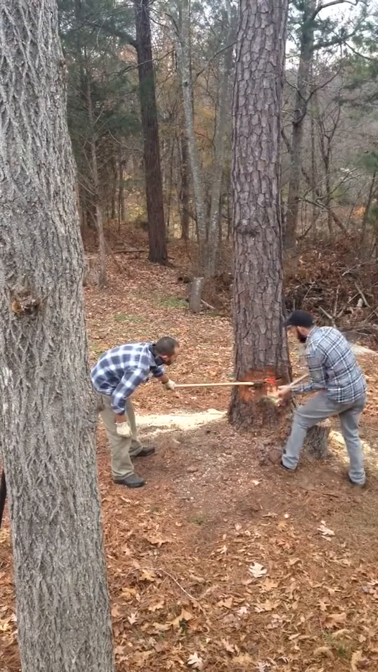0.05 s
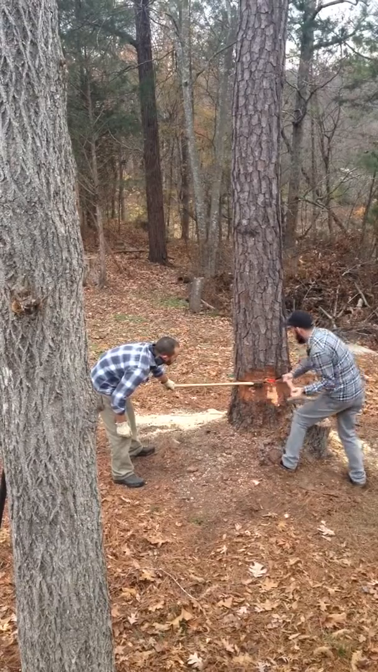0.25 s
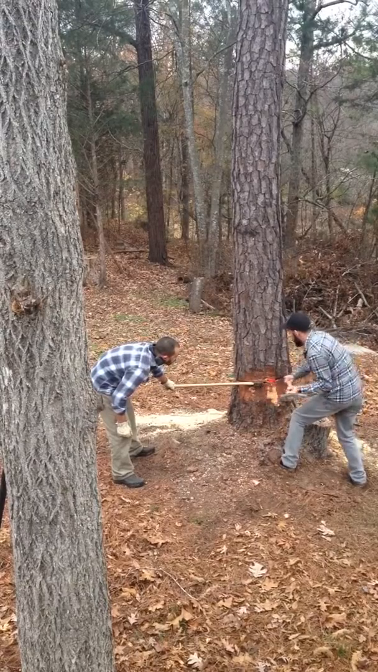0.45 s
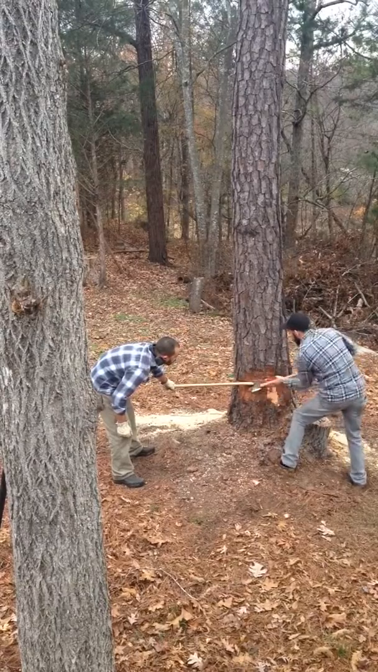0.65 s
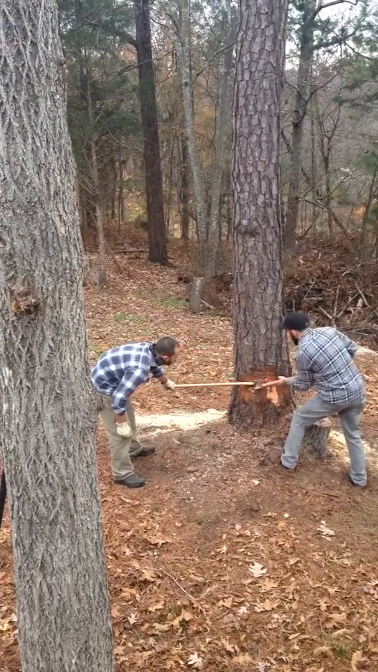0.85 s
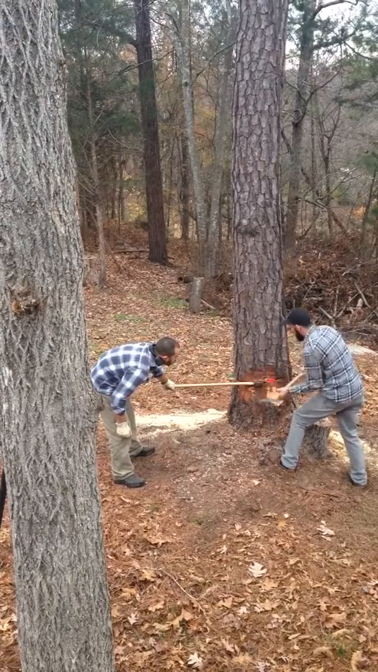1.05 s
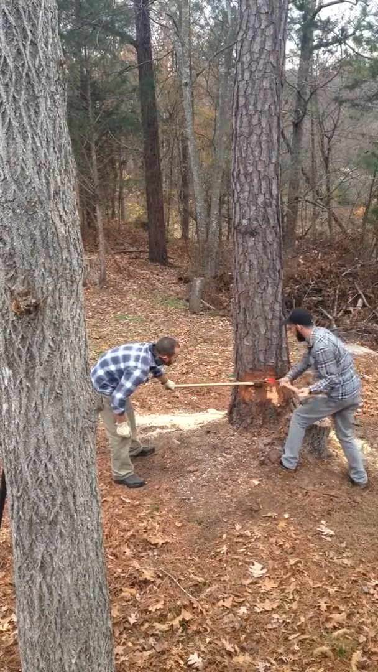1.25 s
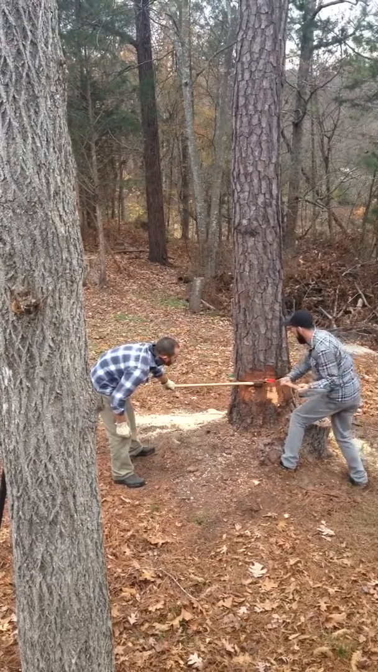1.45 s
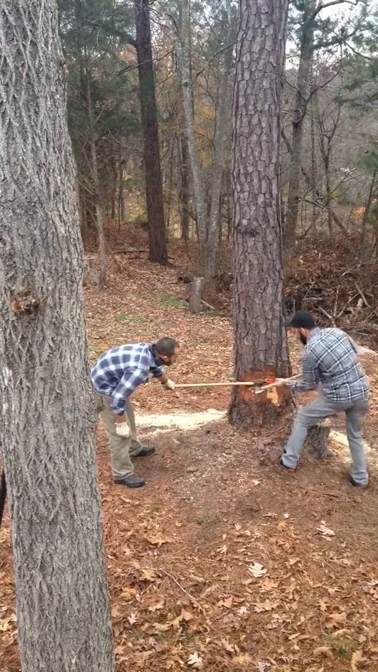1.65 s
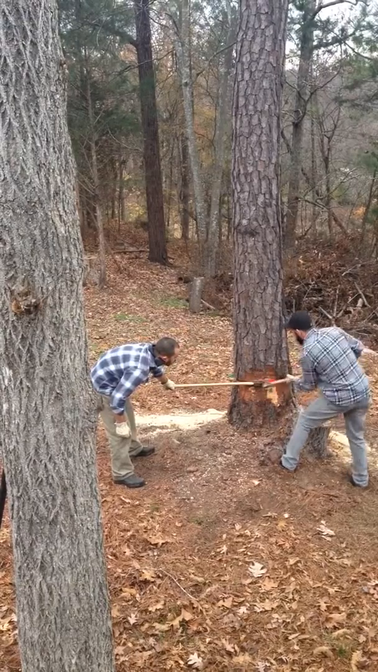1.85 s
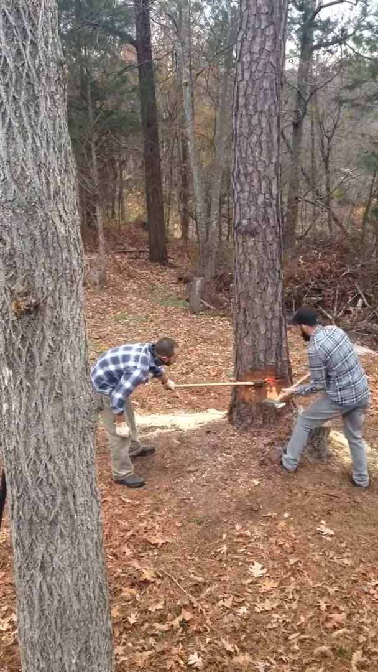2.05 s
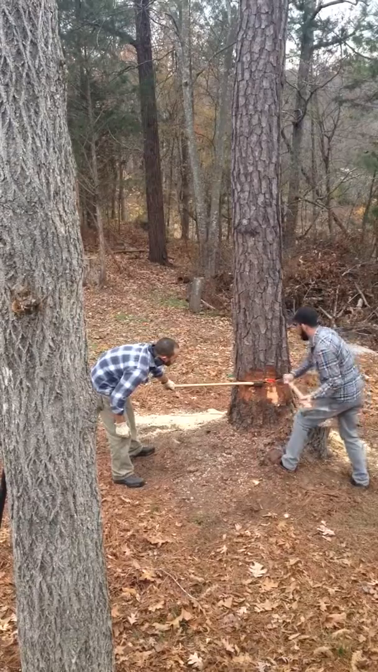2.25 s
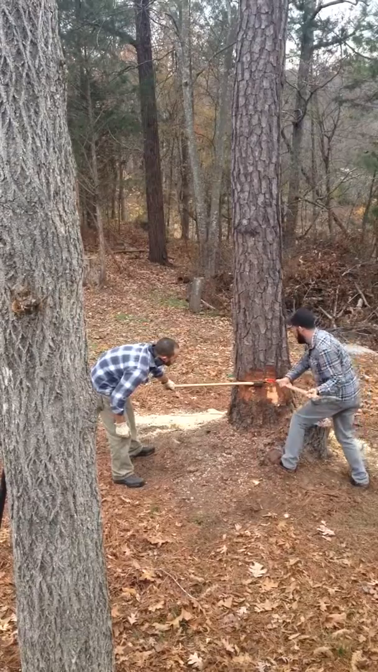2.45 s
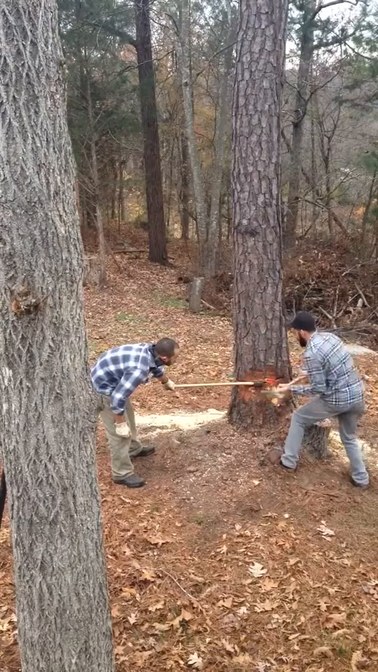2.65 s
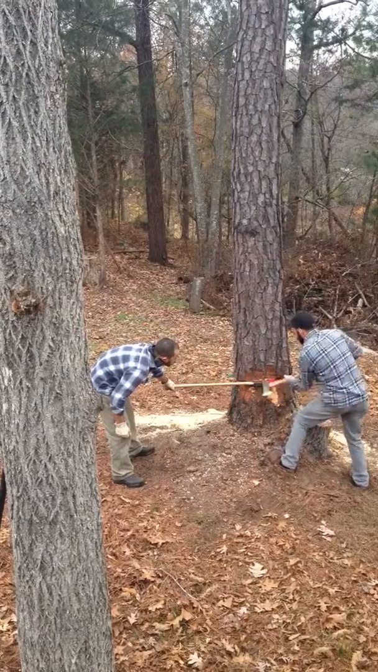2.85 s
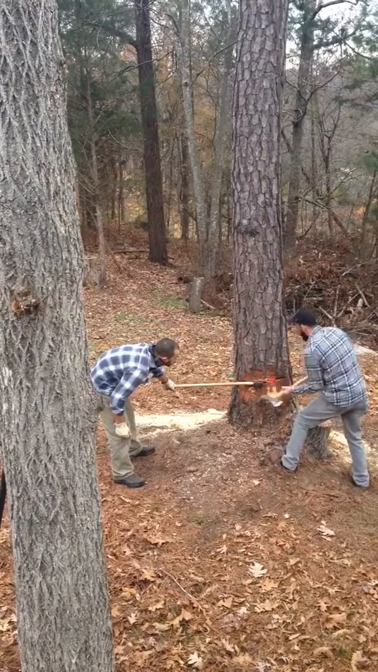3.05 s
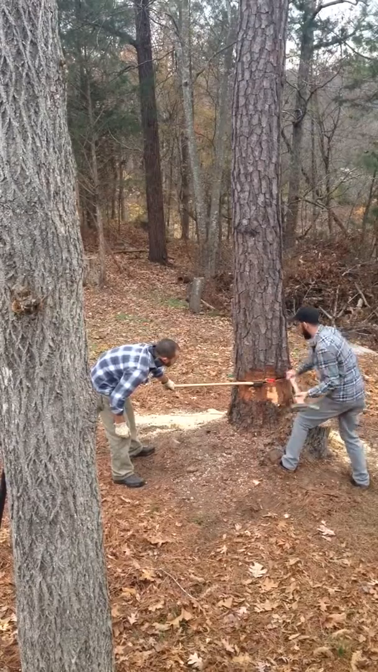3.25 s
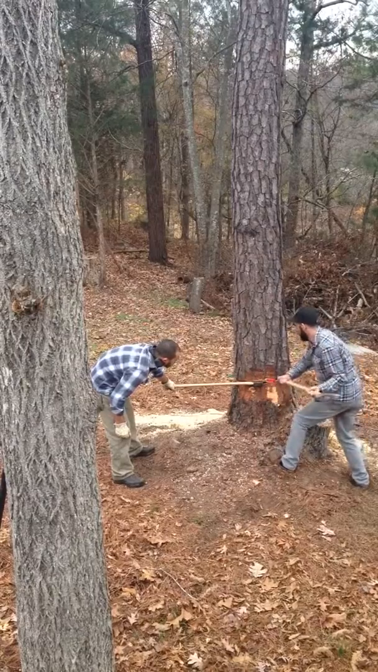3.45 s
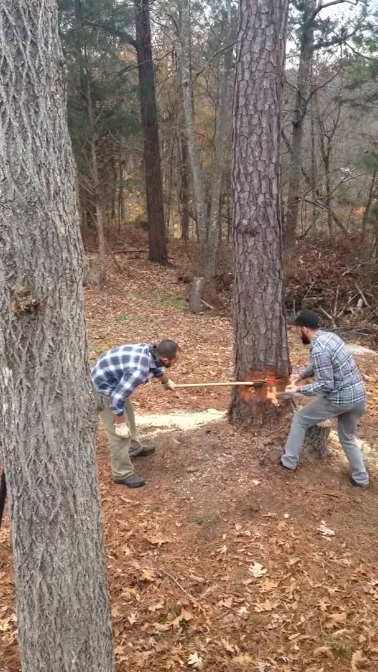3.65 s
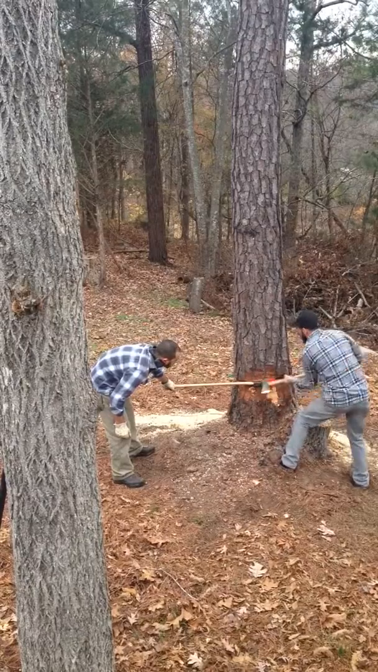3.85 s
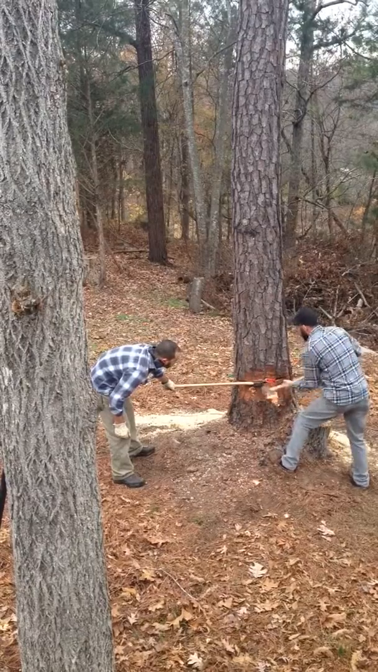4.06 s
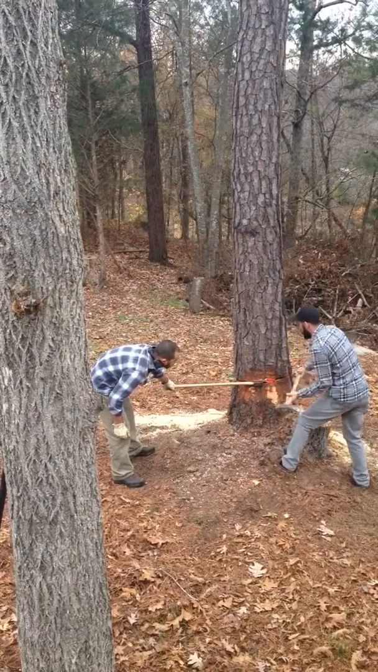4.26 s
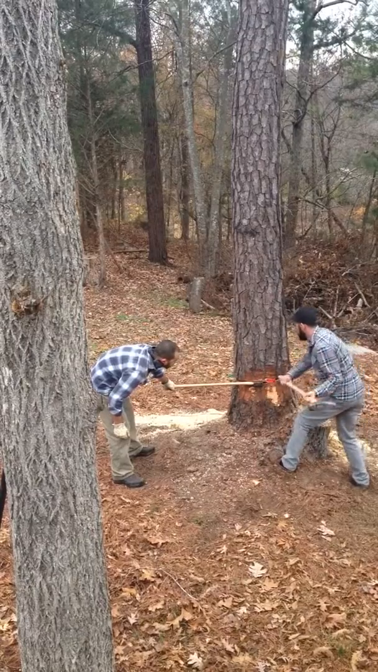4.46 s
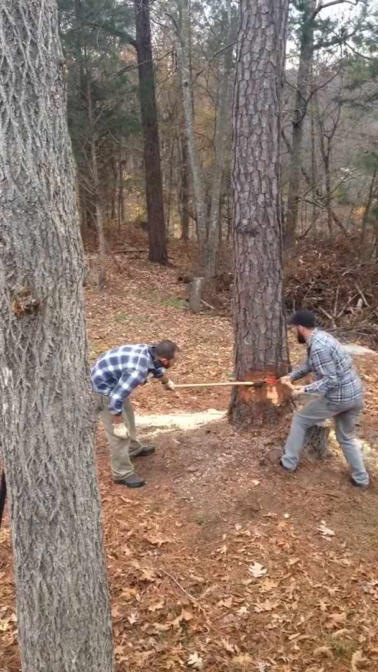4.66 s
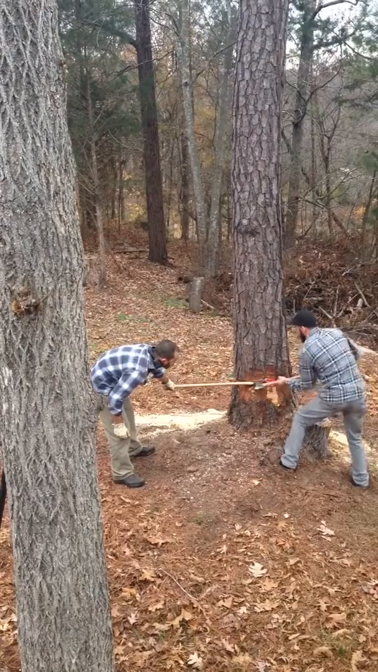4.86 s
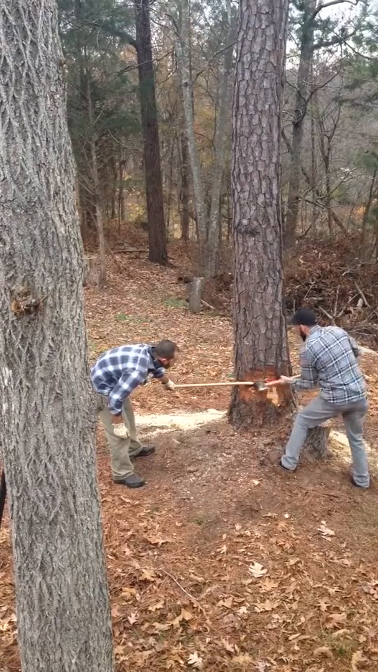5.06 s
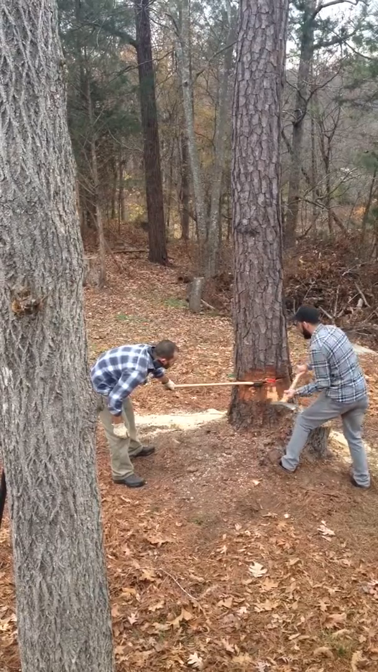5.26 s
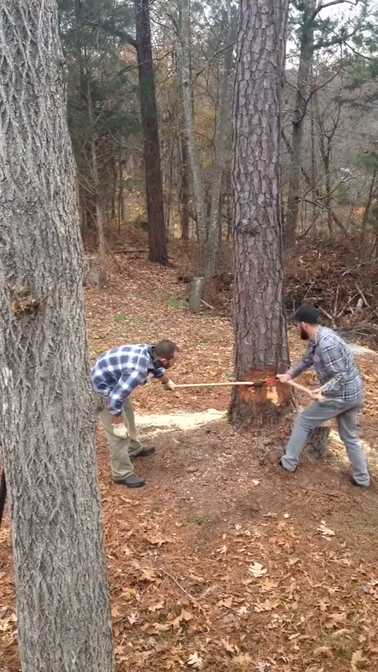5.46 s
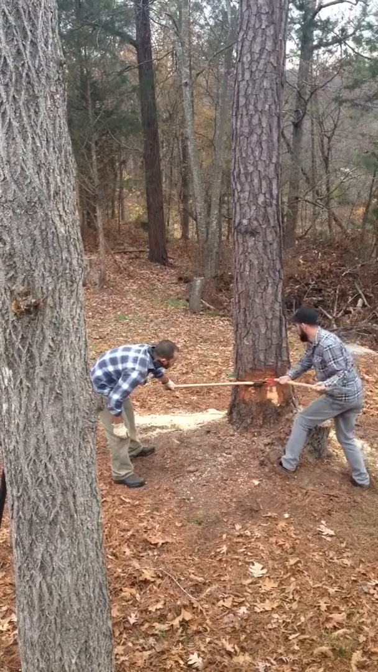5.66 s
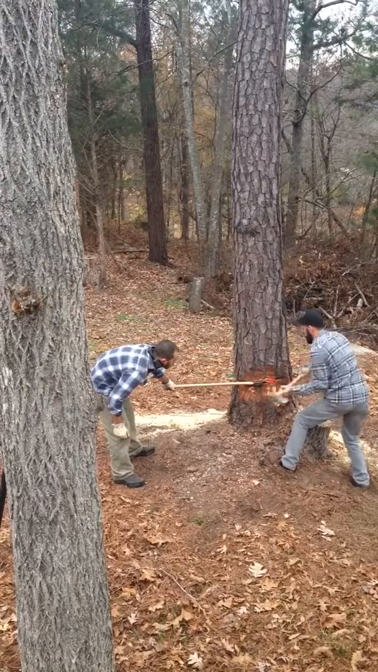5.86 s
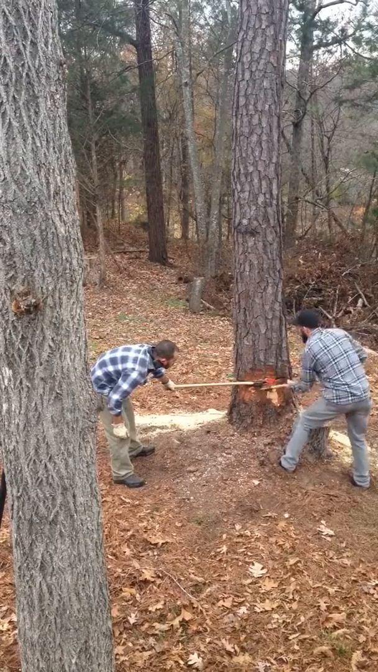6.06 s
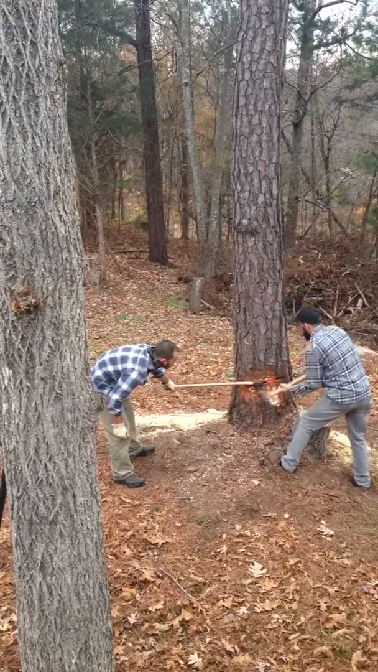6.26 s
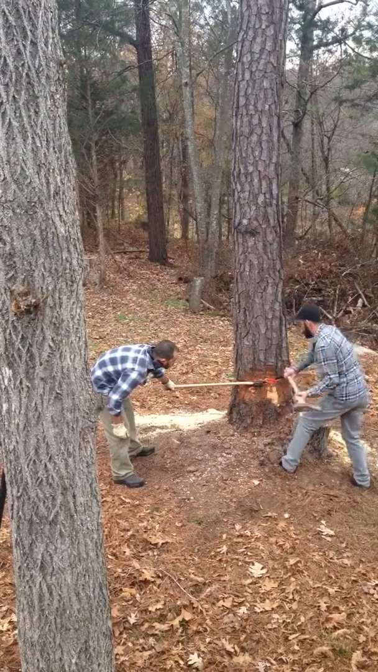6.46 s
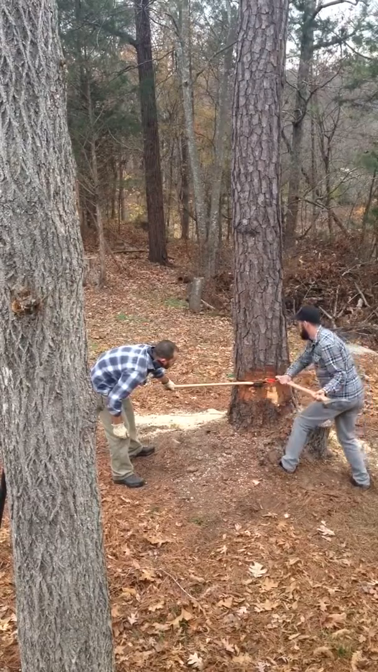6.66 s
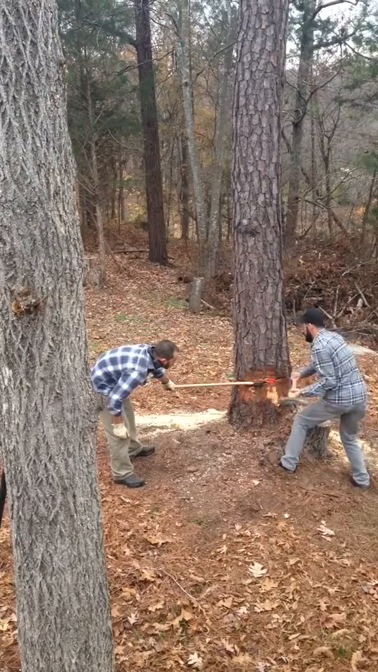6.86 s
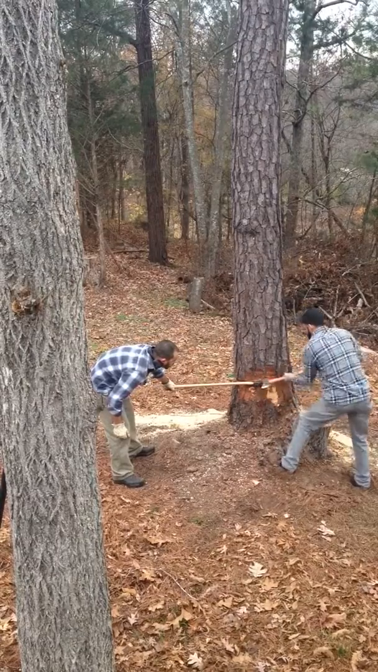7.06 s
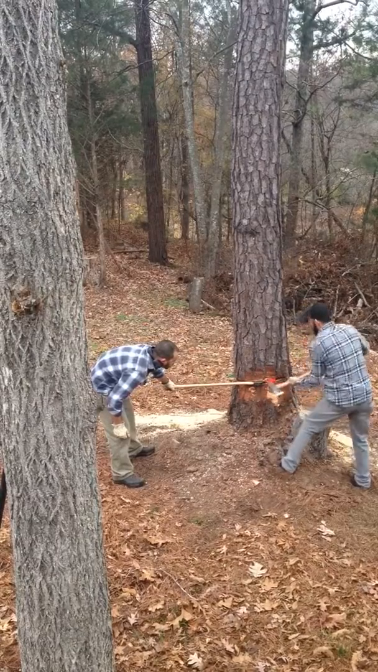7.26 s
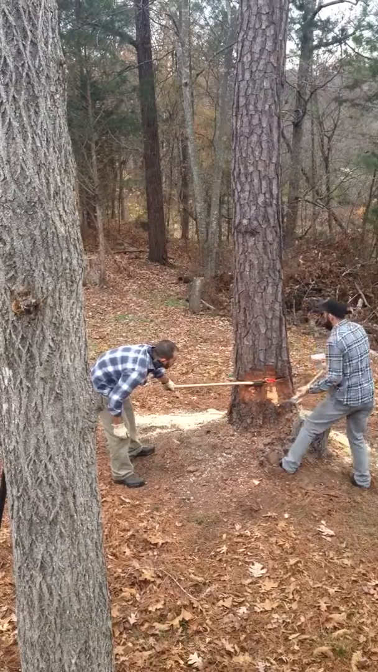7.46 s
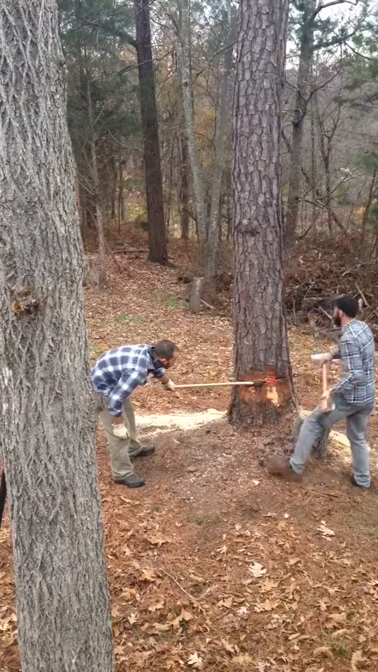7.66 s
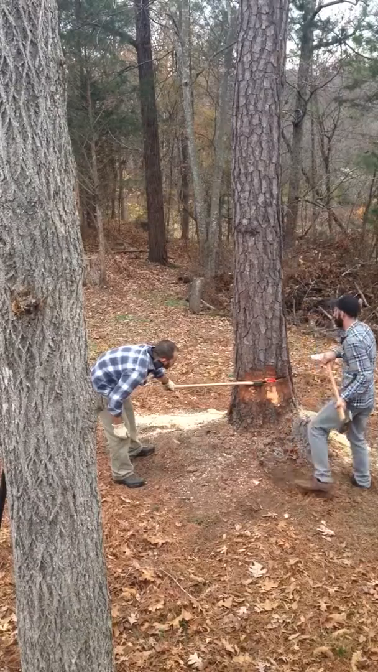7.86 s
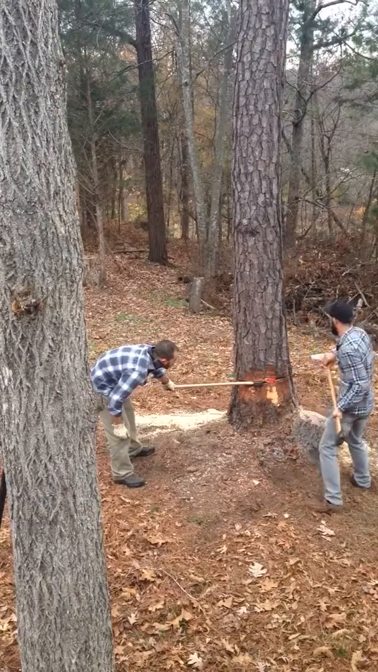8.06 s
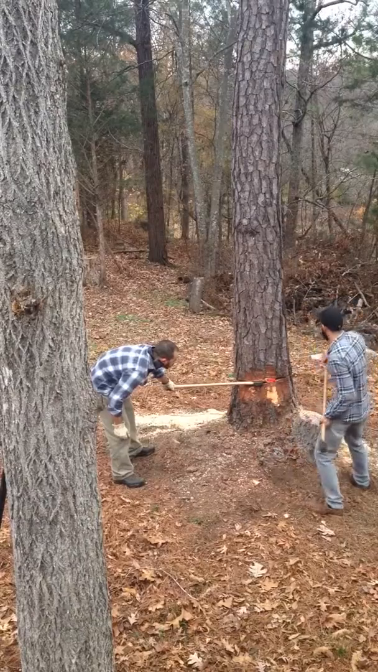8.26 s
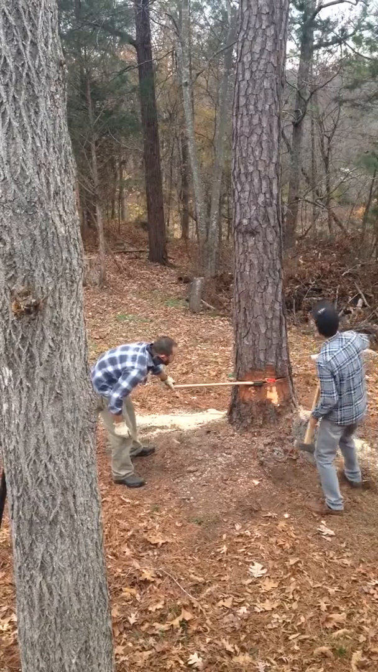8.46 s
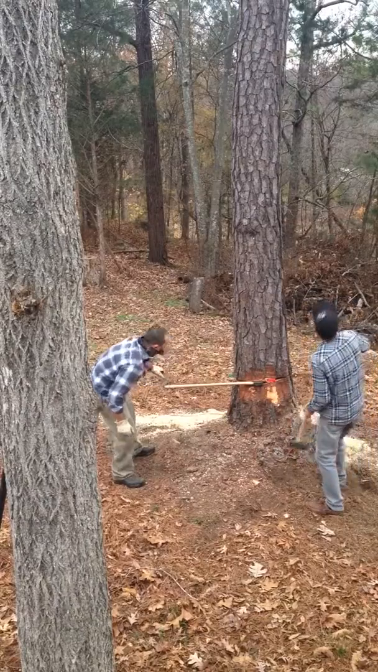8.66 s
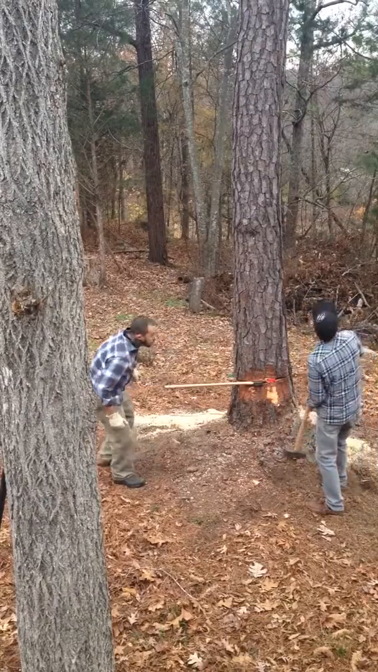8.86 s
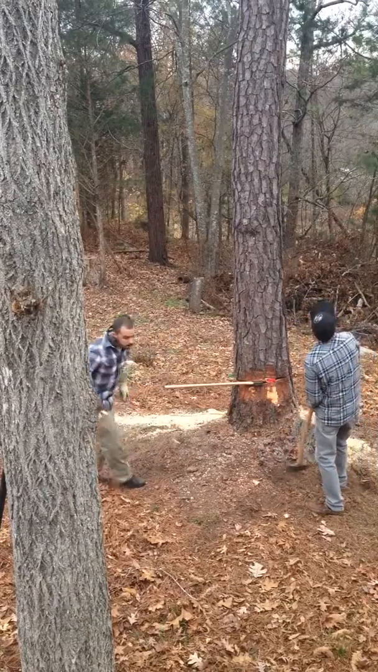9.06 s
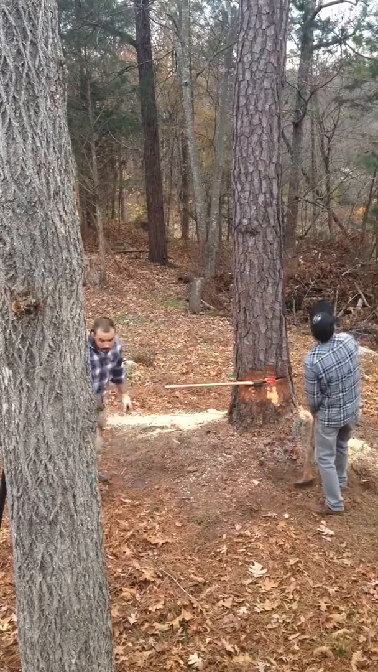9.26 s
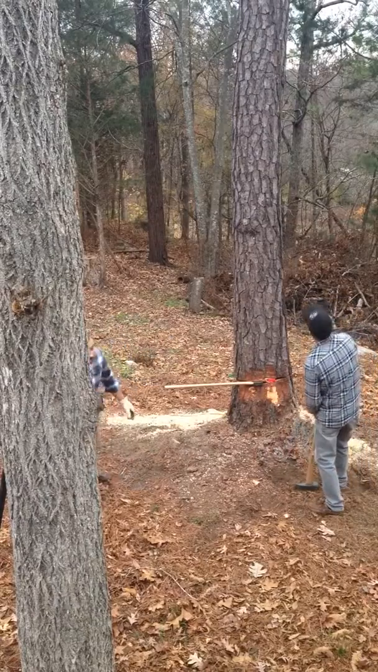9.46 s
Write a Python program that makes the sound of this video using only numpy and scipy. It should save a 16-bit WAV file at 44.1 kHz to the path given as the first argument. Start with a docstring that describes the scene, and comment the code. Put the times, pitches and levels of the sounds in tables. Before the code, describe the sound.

Seven sharp metallic blows on a wedge in a pine echo off surrounding trees, the sixth duller and woody, followed by footsteps in dry leaves.

```python
"""Open woods: a steel maul drives a felling wedge into a pine some metres away, seven blows after a first echo.
Each blow is a noise crack, short wedge knocks, fluttering steel tones and a low trunk thump; trees scatter it back.
As the cut grips the wedge its knock weakens and the ring moves up; one off-centre blow lands dull and woody.
Afterwards a foot comes down with a soft low thud and feet shift in dry leaves, all from coloured noise.
Behind lie soft air, a low rumble and a faint far two-toned hum that comes and goes."""
import sys
import numpy as np
from scipy import signal
from scipy.fft import rfft, irfft, next_fast_len
from scipy.io import wavfile
from scipy.ndimage import uniform_filter1d

SR = 44100
rng = np.random.default_rng(int(sys.argv[2]) if len(sys.argv) > 2 else 0)


def materialize(psi):
    """Save the field psi as 16-bit PCM at rate SR to the path in sys.argv[1].

    A 1-D psi becomes a single channel; in a 2-D psi each row is a channel.
    """
    bounded = np.clip(np.atleast_2d(psi).T, -1, 1)
    quanta = np.round(bounded * 32767).astype(np.int16)
    wavfile.write(sys.argv[1], SR, quanta)


N = 419391
T = np.arange(N) / SR  # time, s


def amp(db):
    """Turns decibels into a plain multiplier."""
    return 10 ** (np.asarray(db) / 20)


def evened(x):
    """Scales to an rms of one."""
    return x / np.sqrt(np.mean(x ** 2) + 1e-20)


def smooth_noise(shape, size):
    """Slowly wandering noise: a running average over size samples, at an rms of one."""
    return evened(uniform_filter1d(rng.standard_normal(shape), size=size))


def read(points, hz):
    """Joins (Hz, value) points on a log-frequency axis."""
    f, value = np.transpose(points)
    return np.interp(np.log(hz + 1), np.log(f), value)


def add(mix, s, sound):
    """Mixes a sound in at time s, which may lie before the start."""
    at = round(s * SR)
    sound = sound[max(-at, 0):]
    part = mix[max(at, 0):][:len(sound)]
    part += sound[:len(part)]


def colour(x, points):
    """Shapes the spectrum by (Hz, dB) points with a filter that never sounds ahead of its input."""
    size = next_fast_len(len(x) + 4096)
    log_gain = np.log(amp(read(points, abs(np.fft.fftfreq(size, 1 / SR)))))
    response = np.exp(np.conj(signal.hilbert(log_gain)))
    return irfft(rfft(x, size) * response[:size // 2 + 1], size)[:len(x)]


def mode(hz, db, t60):
    """One second of a dying sine, as one resonance of a struck body."""
    t = T[:SR]
    return amp(db - 60 * t / t60) * np.sin(2 * np.pi * hz * t)


def burst(rise, decay):
    """A puff of noise of unit energy, its broad bands evened out."""
    t = T[:SR // 6]
    x = rng.standard_normal(len(t)) * (1 - np.exp(-t / rise)) * np.exp(-t / decay)
    power = uniform_filter1d(abs(rfft(x)) ** 2, size=70)
    hz = np.fft.rfftfreq(len(t), 1 / SR) + 1
    return colour(x, np.c_[hz, -10 * np.log10(power)])


# tone of the still outdoor air: pitch_hz, relative_level_db (per Hz)
AIR_COLOUR = [(25, -13), (50, 0), (100, 0), (200, -2), (400, -7), (700, -10), (1100, -14.5), (1700, -18),
              (3000, -17.5), (6000, -22), (15000, -27)]


def still_air(level_db=-68):
    """Steady outdoor air: coloured noise."""
    return amp(level_db) * evened(colour(rng.standard_normal(N), AIR_COLOUR))


# tone of the low rumble: pitch_hz, relative_level_db (per Hz)
RUMBLE_COLOUR = [(30, -11), (100, 2.5), (400, -11), (1000, -29.5)]


def low_rumble(start_db=-71, ebb_db_per_s=0.54):
    """Low coloured noise that slowly ebbs."""
    return amp(start_db - ebb_db_per_s * T) * evened(colour(rng.standard_normal(N), RUMBLE_COLOUR))


HUM_FROM_S, HUM_SWELL_S, HUM_LENGTH_S, HUM_RELEASE_S = .85, 0.8, 2.25, .3
HUM_HZ, HUM_CLIMB_HZ_PER_S = 238, 2.3  # the lower of the two tones
HUM_DB, HUM_FADE_DB_PER_S = -66, 6  # at the top of its swell, then fading


def far_hum(upper_ratio=1.425, upper_db=-1, waver=.004):
    """Two wavering sines that swell, creep up in pitch and fade."""
    t = T - HUM_FROM_S
    hz = HUM_HZ + HUM_CLIMB_HZ_PER_S * t
    swell = np.clip(t / HUM_SWELL_S, 0, 1)
    release = np.clip((HUM_LENGTH_S - t) / HUM_RELEASE_S, 0, 1)
    level = swell * release * amp(HUM_DB - HUM_FADE_DB_PER_S * np.maximum(t - HUM_SWELL_S, 0))
    hum = np.zeros(N)
    for ratio, tone_db in [(1, 0), (upper_ratio, upper_db)]:
        drift = 1 + waver * smooth_noise(N, 2000)
        hum += amp(tone_db) * np.sin(2 * np.pi * np.cumsum(ratio * hz * drift) / SR)
    return level * hum


def distance():
    """The background: air, rumble and far hum together."""
    return still_air() + low_rumble() + far_hum()


# twigs and dry leaves snapping underfoot: start_s, peak_db (before TWIG_DB), pitch_hz (the strongest)
TWIG_SNAPS = [(1.634, -58, 1970), (1.727, -38, 3130), (2.1184, -46, 1830), (2.4588, -44, 3840),
              (8.2173, -46.5, 7640), (8.3124, -48, 12300), (8.356, -56, 3360), (8.4224, -53, 4530),
              (8.4894, -43, 7950), (8.5614, -44, 3950), (8.6418, -45.5, 3940), (9.2974, -45.5, 4860)]
# tone of one snap: pitch_ratio (times the strongest pitch), relative_level_db
SNAP_COLOUR = [(.1, -24.5), (.4, -9.5), (0.749, -4), (1, 0.5), (1.3, -5.5), (2, -9.5), (4, -22.5)]
TWIG_DB = -2.5  # added to every snap's peak


def twigs():
    """Snaps: a sharp puff of noise with a weaker, longer tail."""
    out = np.zeros(N)
    for s, db, hz in TWIG_SNAPS:
        puff = burst(0.0003, 0.0023) + 0.27 * burst(.003, .02)
        snap = colour(puff, np.array(SNAP_COLOUR) * [hz, 1])
        add(out, s, amp(db + TWIG_DB) * snap / abs(snap).max())
    return out


# a heavy step on soil: start_s, peak_db
SOIL_THUDS = [(9.013, -37), (9.033, -47), (9.075, -52)]
# tone of the soil thud: pitch_hz, relative_level_db
SOIL_COLOUR = [(30, -23.5), (90, -0.5), (160, 4), (320, -8), (600, -28), (1500, -50), (8000, -50)]


def soil_thud():
    """A heavy step on soft soil: short, low puffs of noise."""
    out = np.zeros(N)
    for s, db in SOIL_THUDS:
        thud = colour(burst(0.0018, 0.008), SOIL_COLOUR)
        add(out, s, amp(db) * thud / abs(thud).max())
    return out


# footfalls in the leaves: start_s, level_db (before STEP_DB)
FOOTFALLS = [(9.0723, -55.5), (9.2688, -51), (9.2978, -56.5), (9.4694, -51.5)]
# tone of the leaf crackle: pitch_hz, relative_level_db (per Hz)
LEAF_COLOUR = [(100, -2), (1000, -7.5), (2000, -3), (4000, -1.5), (8000, -1.5), (15000, -8)]
# tone of the low shuffle: pitch_hz, relative_level_db (per Hz)
SHUFFLE_COLOUR = [(30, -10), (100, 2), (200, -7), (420, -9.5), (800, -25.5), (3000, -39)]
STEP_RISE_S, STEP_FADE_S, STEP_DB = 0.0045, 0.043, -13  # the crunch of one footfall
STIR_FROM_S, STIR_BUILD_S = 7.36, 0.83  # feet start to move once the blows are over
LEAVES_STILL_DB, LEAVES_STIRRED_DB, SHUFFLE_DB = -89, -72.5, -61.5


def feet_in_leaves(grain_db=2.0, clump_db=2):
    """One effort of the feet drives both the grainy crackle of the leaves and the low shuffle."""
    stir = 1 - np.exp(-np.maximum(T - STIR_FROM_S, 0) / STIR_BUILD_S)
    rustle = amp(LEAVES_STILL_DB) + amp(LEAVES_STIRRED_DB) * stir
    crunch = (1 - np.exp(-T[:SR] / STEP_RISE_S)) * np.exp(-T[:SR] / STEP_FADE_S)
    for s, db in FOOTFALLS:
        add(rustle, s, amp(db + STEP_DB) * crunch)
    # about 5000 separate grains a second, of uneven strength
    strength = amp(grain_db * np.minimum(rng.exponential(1, N), 6))
    crackle = rng.standard_normal(N) * strength * (rng.random(N) < 5000 / SR)
    crackle *= amp(clump_db * smooth_noise(N, 700))
    leaves = rustle * evened(colour(crackle, LEAF_COLOUR))
    shuffle = amp(SHUFFLE_DB) * stir ** 2 * evened(colour(rng.standard_normal(N), SHUFFLE_COLOUR))
    return leaves + shuffle


def ground():
    """Snapping twigs, a heavy step on soil, and feet moving through leaf litter."""
    return twigs() + soil_thud() + feet_in_leaves()


def scatter(lumps_db=1.5):
    """Two seconds of dense reflections, arriving in clumps."""
    size = 2 * SR
    return evened(rng.standard_normal(size) * amp(lumps_db * smooth_noise(size, 200)))


# the blow as the woods return it, fades being the time to drop 60 dB:
# pitch_hz, early_scatter_db, early_fade_s, far_wash_db, far_fade_s
WOODS_RETURN = [(40, 0, .3, -26.5, 1), (130, 5, .22, -18, 1), (430, 7.5, 0.25, -19, 1.2),
                (614, 5.5, 0.36, -14, 0.71), (720, 12, 0.97, -1.5, 6), (914, 2.5, 0.35, -9.5, 1.4),
                (1046, 16.5, .66, 0, 4.3), (1268, 10.5, 0.8, -3.5, 4.2), (1460, 2, 0.47, -9, 1.9),
                (2200, 9, 0.59, -3, 2), (3300, 2.5, .58, -15, 1.5), (5000, 1, 0.41, -19.5, 2.1),
                (8200, -2.5, 0.3, -37.5, .7), (10400, -12, 0.2, -43.5, 0.65), (15000, -21, .2, -55.5, .5)]
# single trunks nearby: delay_s, level_db, centre_hz
TRUNK_SLAPS = [(0.0248, 0.5, 3583), (.062, -7, 2200), (.089, 2.5, 990), (.113, -3, 1250),
               (0.1413, 0.5, 1500), (0.3012, -16, 1430)]


def woods(paths, build=0.018, patch_db=2.0, ripple_db=3):
    """A blow thrown back by the trees: early scatter, a long far wash, and slaps off single rough trunks."""
    hz, t, z = signal.stft(paths, SR, nperseg=512)
    table = np.array(WOODS_RETURN)
    columns = [read(np.c_[table[:, 0], column], hz)[:, None] for column in table.T[1:]]
    near_db, near_t60, far_db, far_t60 = columns
    power = 0
    for db, t60 in [(near_db, near_t60), (far_db, far_t60)]:
        # dividing by the length keeps the total energy of each fade
        power = power + amp(db - 60 * t / t60) ** 2 * np.log(10 ** 6) / (t60 * SR)
    # leaf litter returns the treble at once; the middle waits for the trunks
    rise = read([(400, 0.0035), (700, build), (1500, build), (4000, 0.0028)], hz)[:, None]
    patches = uniform_filter1d(rng.standard_normal(z.shape), size=5, axis=0)
    patches = evened(uniform_filter1d(patches, size=5, axis=1))
    # the many close resonances of the struck steel stay in its echo as ridges
    ridges = np.sqrt(2) * np.sin(np.cumsum(rng.uniform(.8, 2.6, len(hz))))
    ridges = ridges * np.clip(hz / 2000, 0, 1)
    texture = amp(patch_db * patches + ripple_db * ridges[:, None])
    z = z * np.sqrt(power) * (1 - np.exp(-t / rise)) * texture
    out = signal.istft(z, SR, nperseg=512)[1][:len(paths)]
    for delay, db, centre in TRUNK_SLAPS:
        bark = [(centre / 4, -22), (centre / 1.1, -2), (centre * 0.78, 0),
                (centre * 2, -12), (centre * 4, -35), (centre * 7, -65)]
        add(out, delay, amp(db) * colour(burst(0.00061, .002), bark))
    return out


# the trunk's thump, swelling again as the shock returns, fade being the time to drop 60 dB:
# delay_s, pitch_hz (varied slightly each blow), level_db, fade_s
TRUNK_WAVES = [(0, 205, -23.5, .055), (.003, 101, -30.5, 0.18), (.032, 172, -25.5, 0.16),
               (.036, 198, -34.5, 0.11), (0.063, 34, -44, 0.27), (0.109, 124.7, -32, 0.03)]


def trunk(swell=0.0037):
    """Low bending waves of the tree: softly starting, dying sines."""
    out = np.zeros(SR)
    for delay, hz, db, t60 in TRUNK_WAVES:
        wave = mode(hz * rng.normal(1, 0.0088), db, t60)
        add(out, delay, wave * (1 - np.exp(-T[:SR] / swell)))
    return out


# the wedge gripped in the cut, damped by the wood: pitch_hz, level_db (before knock_db), fade_s (to drop 60 dB)
WEDGE_TONES = [(740, -21, 0.075), (1123, -17, 0.039), (1954, -17.5, 0.035), (2134, -27, 0.054),
               (2580, -25, 0.032), (3250, -19.5, 0.038), (3450, -22.5, .02), (3810, -20.5, 0.025)]
# tone of the crack: pitch_hz, relative_level_db
CRACK_COLOUR = [(40, -10), (220, 11.5), (330, 5), (550, 13), (900, 12), (1500, 10.5), (2000, 12),
                (3300, 13.5), (4700, 13), (5500, 8.5), (7800, 10.5), (10500, 0), (15500, -4.5)]


def impact(knock_db, ground_delay=.0018, ground_share=0.97, chatter_db=-8, crack_db=-2):
    """Steel meets steel: a crack, its bounce off the ground, brief chatter, and the wedge's short knock."""
    crack = burst(.0008, 0.00078) + amp(chatter_db) * burst(0.0022, 0.0028)
    add(crack, ground_delay, ground_share * burst(.0002, 0.0023))
    # neighbouring tones start in opposite directions
    knock = sum(mode(*row) * (-1) ** k for k, row in enumerate(WEDGE_TONES))
    out = np.zeros(SR)
    add(out, .001, amp(knock_db) * knock)
    add(out, 0, amp(crack_db) * colour(crack, CRACK_COLOUR))
    return out


def ring(hz, db, t60, flutter_hz=30, scattered=.72, steady=1.4, swing_away=0.081, build=0.0047):
    """One steel tone: direct, then fluttering as the maul swings away and its tree paths interfere."""
    t, shift = T[:SR], np.fft.fftfreq(SR, 1 / SR)
    noise = rng.standard_normal(SR) + 1j * rng.standard_normal(SR)
    paths = np.fft.ifft(noise / (1 + (shift / flutter_hz) ** 2))
    paths *= (1 - np.exp(-t / build)) / np.sqrt(np.mean(abs(paths) ** 2))
    flutter = steady / (1 + t / swing_away) + scattered * paths
    return amp(db - 60 * t / t60) * (flutter * np.exp(2j * np.pi * hz * t)).real


# blows of the maul, the first only still echoing, off_centre and grip running from 0 to 1:
# start_s, force_db (all but the ring), off_centre, grip (of the cut on the wedge), ring_db, fizz_db (above 10 kHz)
BLOW_ROWS = [(-.29, 2, 0.26, 0, 2, 0), (.7633, -1, 0, 0.06, -6, -5), (1.7864, -0.9, 0, 0.01, -3.5, -6),
             (2.864, 2, .16, 0.05, 0.5, 1.5), (3.9155, 1.5, 0.09, .12, 0.5, 2.5),
             (4.9751, 1.24, 0.17, .55, -6, 0.5), (6.0587, 3.5, 1, .65, -6.5, 1.5),
             (7.1061, 0.45, 0, 0.93, 2, 2)]
# three main tones of the steel's free ring, moving to the highest of them as the cut grips:
# pitch_hz, level_db (before the blow's changes), full_grip_change_db, fade_s (to drop 60 dB)
STEEL_TONES = [(4962, -45.5, 3.5, 0.5), (5163, -34.5, -15, 0.64), (6059, -47, 11.5, .78)]
# further steel tones, below and above the main three:
# pitch_hz, level_db (before the blow's changes), fade_s (to drop 60 dB)
STEEL_SIDE_TONES = [(3860, -47, 0.29), (8350, -51.5, .25), (10000, -49, .2), (11000, -51.5, 0.2)]
# what a fully off-centre blow changes: more wood, less steel (dB)
OFF_BODY_DB, OFF_BITE_DB, OFF_KNOCK_DB, OFF_TREBLE_DB, OFF_ECHO_DB = 10.5, 3.5, -3, -13, -7
GRIP_KNOCK_DB, GRIP_TREBLE_DB = -4, -3.5  # what a full grip of the cut takes from the wedge


def maul(side_db=0, knock_in_echo=0.7, square_body_db=-2.0, echo_db=1.13):
    """Every blow: striking steel and trunk, echoed by the woods, with the steel ringing on."""
    out, standing_trees = np.zeros(N), scatter()
    for s, force_db, off_centre, grip, ring_db, fizz_db in BLOW_ROWS:
        knock_db = OFF_KNOCK_DB * off_centre + GRIP_KNOCK_DB * grip
        treble_db = OFF_TREBLE_DB * off_centre + GRIP_TREBLE_DB * grip
        echo = woods(evened(standing_trees + scatter()))  # half of the paths change with each swing
        # the harder the wedge knocks, the more of its pitch comes back
        echo = colour(echo, [(550, 0), (1100, knock_in_echo * knock_db), (1600, 0)])
        hit = amp(echo_db + OFF_ECHO_DB * off_centre) * echo
        add(hit, 0, impact(knock_db))
        add(hit, 0, trunk())
        # an off-centre blow loses its treble and gains body
        shade = [(200, 0.0028), (350, square_body_db + OFF_BODY_DB * off_centre), (650, 0.0015),
                 (2000, 0), (3300, OFF_BITE_DB * off_centre),
                 (4600, treble_db), (8500, treble_db), (10500, treble_db + fizz_db)]
        add(out, s, amp(force_db) * colour(hit, shade))
        for hz, db, gripped_db, t60 in STEEL_TONES:
            add(out, s, ring(hz, db + gripped_db * grip + ring_db, t60))
        for hz, db, t60 in STEEL_SIDE_TONES:
            add(out, s, ring(hz, db + side_db + treble_db + ring_db, t60))
    return out


def scene():
    """The distance, ground sounds and blows, in one channel."""
    return (distance() + ground() + maul())[None]


def record(dry, low_cut_hz=42, edge_hz=15500):
    """A gentle low cut removes the deepest bass; then a steep filter removes everything above the edge."""
    low_cut = signal.butter(2, low_cut_hz, "high", fs=SR, output="sos")
    thinned = signal.sosfilt(low_cut, dry)
    band_limit = signal.firwin(511, edge_hz, window=("kaiser", 9), fs=SR)
    return signal.oaconvolve(thinned, band_limit[None], "same")


dry = scene()
out = record(dry)
materialize(out)
```